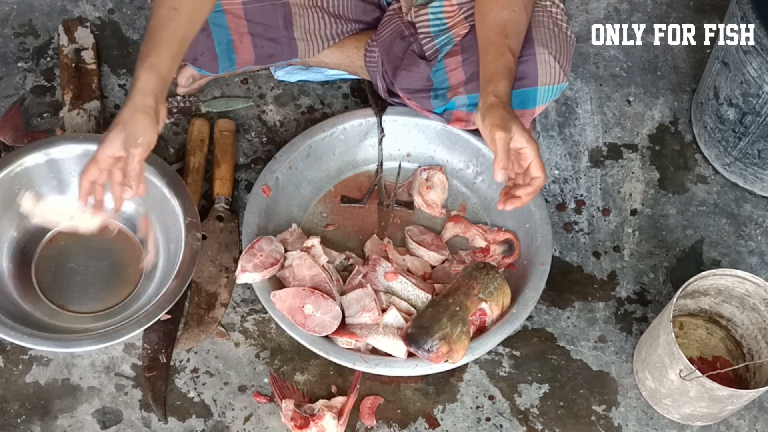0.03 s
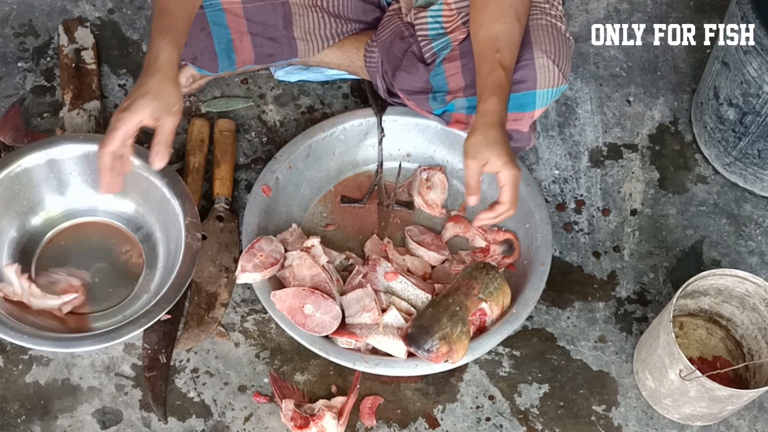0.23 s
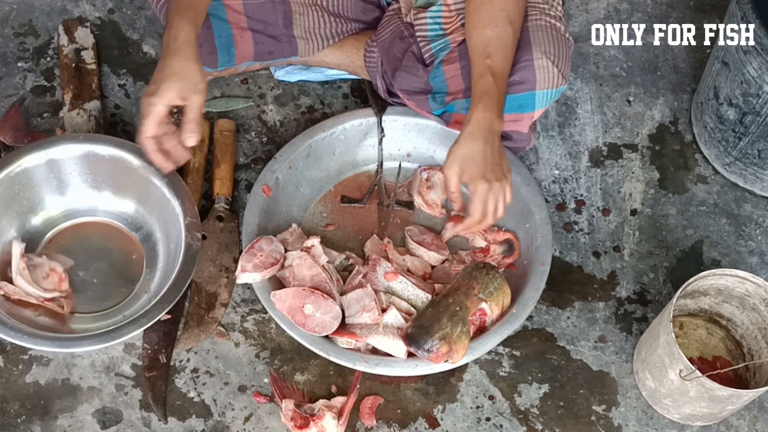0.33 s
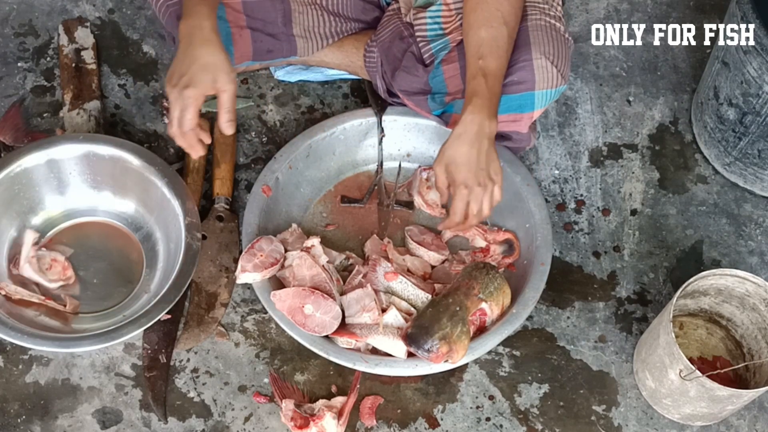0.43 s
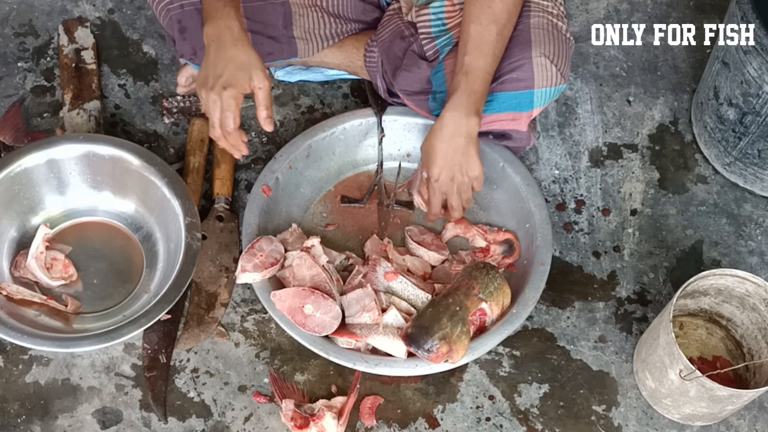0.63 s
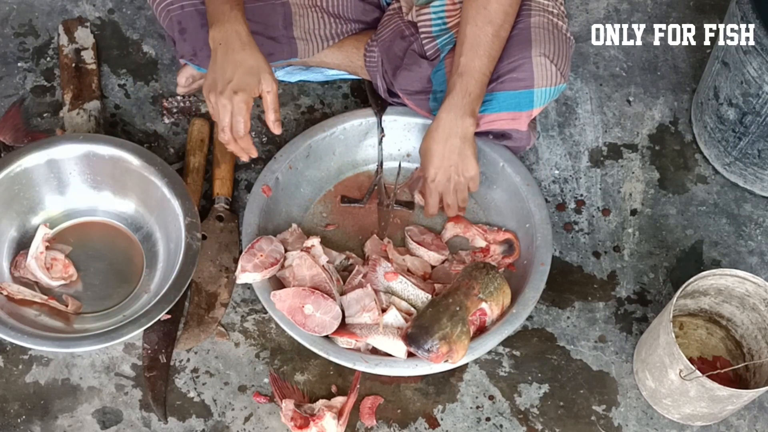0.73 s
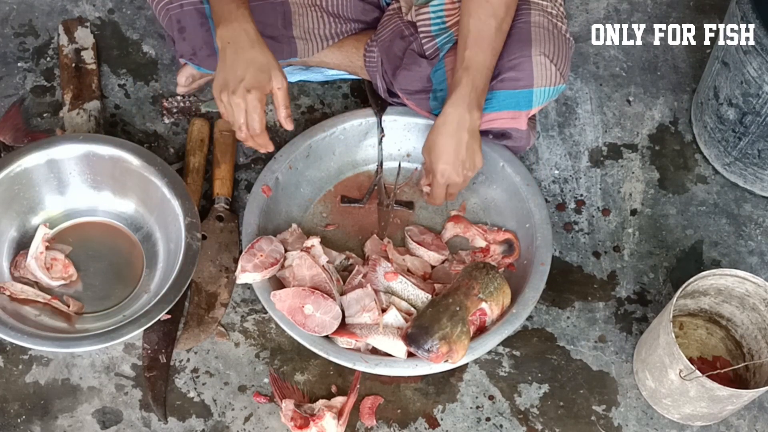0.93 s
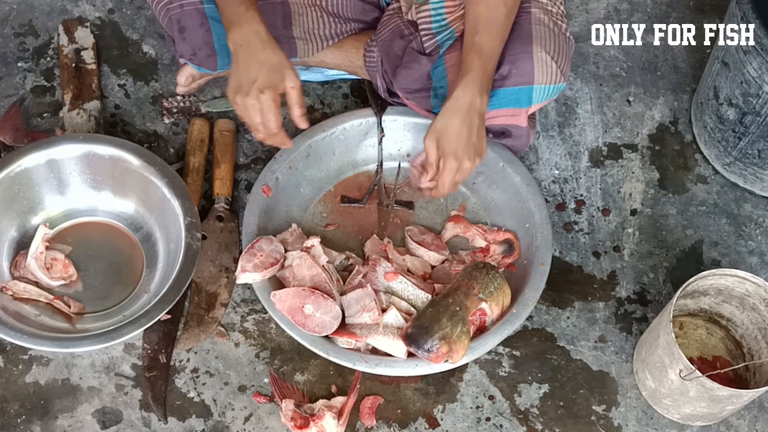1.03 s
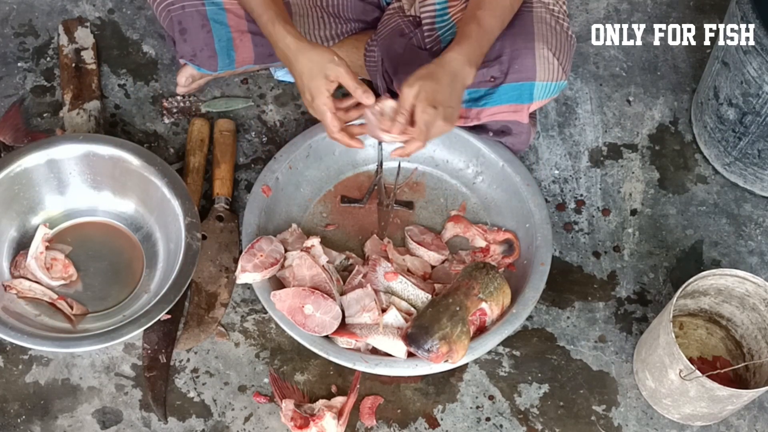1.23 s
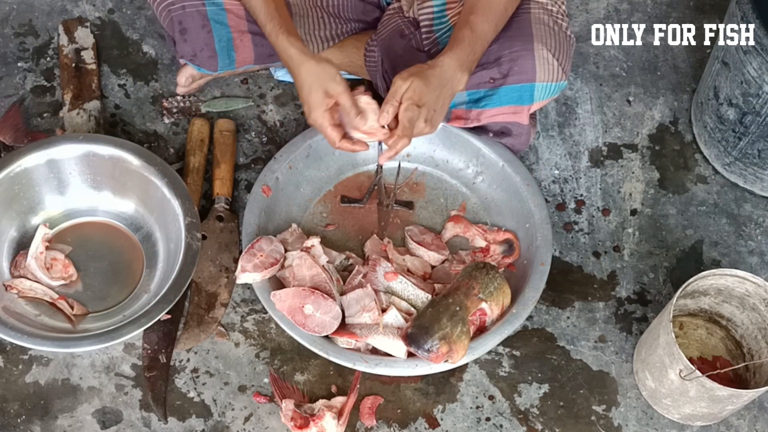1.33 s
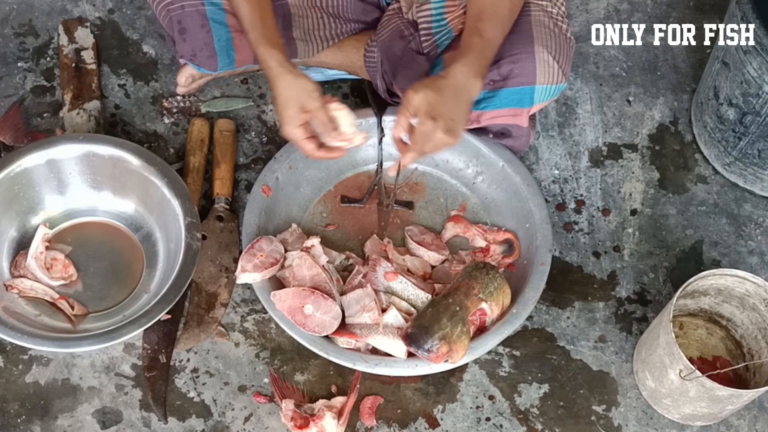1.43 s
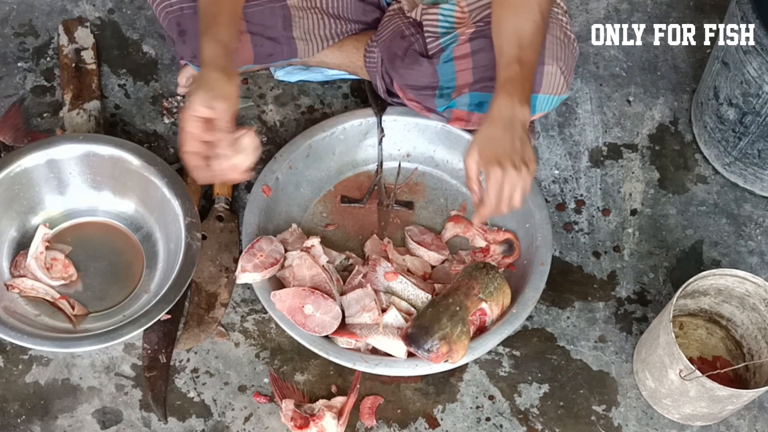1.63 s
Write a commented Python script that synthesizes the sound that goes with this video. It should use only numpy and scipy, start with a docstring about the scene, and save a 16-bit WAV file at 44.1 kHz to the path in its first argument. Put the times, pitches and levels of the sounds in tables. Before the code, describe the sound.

Wet fish lands in a metal bowl with a slap and short ring, birds chirping faintly.

```python
"""An echoing yard, stereo microphones close to a steel bowl. A wet piece of fish is tossed in: it slaps,
slides and flops while the bowl's modes ring and juice spatters. A puff of air brushes the left
microphone, then a hand nudges the pieces in a second basin. Some way off, birds chirp and rasp,
heard mostly by way of the walls, over a low outdoor hum."""
import sys
import numpy as np
from scipy import signal
from scipy.fft import rfft, irfft
from scipy.io import wavfile
from scipy.ndimage import uniform_filter1d, map_coordinates

SR = 44100
rng = np.random.default_rng(int(sys.argv[2]) if len(sys.argv) > 2 else 0)


def materialize(psi):
    """Save the field psi as 16-bit PCM at rate SR to the path in sys.argv[1].

    A 1-D psi becomes a single channel; in a 2-D psi each row is a channel.
    """
    bounded = np.clip(np.atleast_2d(psi).T, -1, 1)
    quanta = np.round(bounded * 32767).astype(np.int16)
    wavfile.write(sys.argv[1], SR, quanta)


N = 74970
STRIKE_S = .2266  # the fish lands


def undb(db):
    """Decibels to gain."""
    return 10 ** (np.asarray(db) / 20)


def unit(x):
    """Scale to rms 1."""
    return x / np.sqrt(np.mean(x ** 2) + 1e-20)


def since(start=0):
    """Seconds elapsed since a moment, zero before it."""
    return np.maximum(np.arange(N) / SR - start, 0)


def fade(t, t60):
    """Exponential decay by 60 dB in t60 seconds."""
    return np.exp(-np.log(1000) * t / max(t60, 1e-3))


def colour(x, points, power=1):
    """Minimum-phase filter through (f/Hz, level/dB) points; power scales the decibels."""
    hz, db = np.array(points, float).T
    f = np.maximum(np.fft.rfftfreq(2 * N, 1 / SR), 1)
    gain = undb(np.interp(np.log(f), np.log(hz), db))
    cepstrum = irfft(power * np.log(gain))
    cepstrum[1:N] *= 2
    cepstrum[N + 1:] = 0
    return irfft(rfft(x, 2 * N) * np.exp(rfft(cepstrum)))[..., :N]


def noise(points):
    """Coloured noise, unrelated left and right."""
    return unit(colour(rng.standard_normal((2, N)), points))


def wander(hz):
    """Smooth random motion of rms 1."""
    size = max(int(SR / hz), 1)
    return unit(uniform_filter1d(uniform_filter1d(rng.standard_normal(N), size), size))


def ring(x, response):
    """Pass a sound through an impulse response."""
    return signal.fftconvolve(np.atleast_2d(x), response, axes=-1)[:, :N]


def arch(start, length):
    """Progress 0-1 through a call and its swelling envelope."""
    progress = np.clip(since(start) / length, 0, 1)
    return progress, np.sqrt(np.abs(np.sin(np.pi * progress)))


def bowl():
    """The landing rings the bowl: high modes at once, low ones slowly as the soft flesh settles."""
    # modes of the steel, one list each: f/Hz, level/dB, t60/s, left minus right/dB
    mode_hz = [238, 278, 400, 538, 597, 642, 711, 1013, 1203, 1435, 1643, 1690, 1772, 1995, 2092, 2237,
               2290, 2505, 2568, 2776, 3195, 5250, 5944, 6305]
    mode_db = [-24.5, -38.5, -20, -13, -15, -16.5, -25.5, -19, -25.5, -16, -21.5, -27, -28.5, -26, -26,
               -23.5, -27.5, -22, -20, -26, -30.5, -44.5, -43, -39.5]
    mode_t60 = [0.33, 1, .25, .37, 0.41, .25, .3, .2, .33, .17, .24, .3, .38, .3, .35, .27, .35, .2, .2, .2,
                .18, .28, .24, .24]
    mode_pan = [0, 8, -3.5, 0.5, 1.5, -6, 2.5, 1, 0, 3.5, 11.5, -5.5, 0.5, -1.5, 0.5, 10, -1, 2.5, -3.5,
                -13, -1, -2.5, -8, -5.5]
    swell_s, swell_hz = .075, 550  # modes above this pitch swell faster
    rest_s, choke_t60_s, choke_above_hz = .427, .14, 350
    t, out = since(STRIKE_S), 0
    for k, (hz, db, t60, pan_db) in enumerate(zip(mode_hz, mode_db, mode_t60, mode_pan)):
        swell = 1 - np.exp(-t / (swell_s * min(swell_hz / hz, 1) ** 2))
        mode = (-1) ** k * np.sin(2 * np.pi * hz * t) * swell * fade(t, t60)
        if hz > choke_above_hz:  # the fish comes to rest and damps the steel
            mode = mode * fade(since(rest_s), choke_t60_s)
        out = out + mode * undb(db + np.array([[pan_db], [-pan_db]]) / 2)
    return out


def splatter():
    """Each wet contact squeezes out a burst of juice, heard as squelch and spray."""
    # contacts: t/s, level/dB, rise/s, t60/s, treble/dB
    splats = [(.2262, -26.5, .001, 0.16, -1), (.235, -21.5, .004, 0.22, 1), (.288, -38, 0.0043, 0.28, 12),
              (0.307, -28, 0.0051, 0.16, -6.5)]
    body_power, treble_power = 0, 0
    for start, db, rise, t60, treble_db in splats:
        t = since(start)
        burst = undb(db) * np.minimum(t / rise, 1) * fade(since(start + rise), t60)
        body_power += burst ** 2
        treble_power += (burst * undb(treble_db)) ** 2
    return squelch(np.sqrt(body_power)) + spray(np.sqrt(treble_power))


def drops(per_s=3500, scatter_db=1):
    """A dense stream of tiny wet clicks of uneven size."""
    clicks = (rng.random(N) < per_s / SR) * rng.choice([-1, 1], N)
    return clicks * undb(scatter_db * rng.standard_normal(N))


def squelch(envelope, width=.91):
    """Juice squelches out under the skin, wider between the microphones above 1 kHz."""
    # squelch spectrum: f/Hz, level/dB
    spectrum = [(60, -40.5), (130, -12.5), (200, -7), (330, -2.5), (580, -2), (820, 0.5), (1400, -2),
                (2600, -1.5), (3400, -11.5), (5000, -21.5), (15000, -58)]
    side = width * colour(drops(), [(500, -11.5), (1500, 1.5)]) * np.array([[1], [-1]])
    return unit(colour(drops() + side, spectrum)) * envelope


def thin_wall(low_hz=3080, high_hz=15050, count=130, t60=.05):
    """Impulse response of the dense upper modes of the bowl's thin wall."""
    t = since()[:N // 4]
    places = (np.arange(count) + rng.random(count)) / count
    pitches = low_hz + (high_hz - low_hz) * places
    modes = sum(np.sin(2 * np.pi * (hz * t + rng.random((2, 1)))) for hz in pitches)
    return unit(modes * fade(t, t60)) / np.sqrt(len(t))


def spray(envelope):
    """Droplets fizz and stir the bowl's wall; the finest stop first, so the fizz dulls."""
    # spray spectrum: f/Hz, level/dB
    spectrum = [(1500, -22), (3500, -5), (5300, 4.5), (7000, -2.5), (8500, -12), (11000, -17.5),
                (15000, -14)]
    # treble loss once the finest spray stops: f/Hz, level/dB
    dulling = [(7500, -1.5), (9500, -5)]
    wall = thin_wall()
    droplets = undb(-10) * unit(colour(np.array([drops(), drops()]), spectrum)) * envelope
    fizz = droplets + undb(-3.5) * ring(droplets, wall)
    fresh = fade(since(.324), t60=.18)
    return fresh * fizz + (1 - fresh) * colour(fizz, dulling)


def slap():
    """The skin cracks against the metal in one short burst of noise."""
    # crack spectrum: f/Hz, level/dB
    spectrum = [(300, -32.5), (1000, -14.5), (1800, -5), (2600, 2.5), (3200, -11.5), (5000, -22.5),
                (8000, -35), (15000, -32)]
    t = since(STRIKE_S)
    return undb(-14.5) * noise(spectrum) * (t > 0) * fade(t, t60=.064)


def notes_and_throb():
    """Short hollow notes and squeaks as the fish lands, then the bowl's ringing throbs near 570 Hz."""
    # tone pulses: t/s, f/Hz, level/dB, swell/s
    pulses = [(.236, 583, -23, .007), (.244, 230, -37, .005), (0.2534, 1300, -21.5, .004),
              (.2615, 581.4, -18.5, 0.0025), (.2795, 576, -14.5, 0.0052), (0.285, 1685, -27.5, .012),
              (0.289, 199.8, -35, 0.012), (.312, 2113, -22, .01), (0.3172, 578, -31, 0.0077),
              (.3335, 557, -26, 0.0058), (.3495, 595, -26.5, 0.0043), (.35, 167, -46.5, 0.015),
              (.368, 570, -52, 0.0014)]
    out = 0
    for start, hz, db, swell in pulses:
        t = since(start)
        envelope = t / swell * np.exp((1 - (t / swell) ** 2) / 2)
        out += undb(db) * envelope * np.sin(2 * np.pi * hz * t)
    return out


def nudges():
    """Pieces shift in the loaded second basin: a damped note and a short wet rustle each."""
    # nudges: t/s, level/dB, f/Hz, t60/s
    shifts = [(0.7075, -46.5, 1457, .03), (.709, -54.5, 550, 0.25), (0.7645, -37, 547, 0.098),
              (.779, -52.5, 1550, 0.1), (0.803, -47, 1353, .04), (0.81, -43, 1200, .045),
              (.818, -46.5, 906, 0.068)]
    # rustle spectrum: f/Hz, level/dB
    spectrum = [(150, -46), (400, -20), (550, -14), (720, 0), (950, -4), (1500, 1), (1800, -3.5),
                (2200, -15), (5000, -23), (12000, -50)]
    notes, rustle_power = 0, 0
    loudest_db = max(row[1] for row in shifts)
    for start, db, hz, t60 in shifts:
        t = since(start)
        notes += undb(db) * np.sin(2 * np.pi * hz * t) * fade(t, t60) * (1 - np.exp(-t * hz))
        rustle_db = -59 + .16 * (db - loudest_db)  # barely follows the note's level
        rustle_power += (undb(rustle_db) * (t > 0) * fade(t, t60=.28)) ** 2
    return notes + np.sqrt(rustle_power) * noise(spectrum)


def puffs(right_db=-31):
    """Puffs of air: slow pressure swings, almost only on the left microphone."""
    # swings: t/s, level/dB, width/s, f/Hz
    swings = [(.008, -43, .01, 57.3), (0.058, -53.5, 0.036, 45), (0.366, -31, 0.013, 60),
              (0.391, -20.5, 0.0057, 62.6), (0.418, -31.5, 0.0053, 42), (0.477, -37.5, .011, 56.7),
              (0.609, -54.5, 0.02, 50.3), (1.588, -52, 0.029, 58.9)]
    t, air = since(), 0
    for at, db, width, hz in swings:
        envelope = np.exp(-((t - at) / width) ** 2 / 2)
        air += undb(db) * envelope * np.sin(2 * np.pi * hz * (at - t))
    return air * undb([[0], [right_db]])


def chirps(waver_hz=697):
    """Distant birds give thin, wavering whistles that glide."""
    # whistles: t/s, length/s, start f/Hz, end f/Hz, level/dB, waver/share of pitch
    whistles = [(-.03, 0.036, 3470, 3286, -32.5, 0.046), (0.012, 0.049, 3220, 1693, -51.5, 0.039),
                (0.037, 0.18, 3558, 3580, -67, 0.0049), (.045, 0.031, 1766, 1748, -53, 0.014),
                (.142, 0.055, 7180, 6560, -55.5, 0.051), (0.185, 0.041, 5840, 6020, -50, 0.027),
                (0.185, 0.045, 7030, 7060, -47.5, 0.0088), (0.424, 0.093, 3620, 3620, -70.5, 0.0062),
                (.61, 0.032, 5150, 4690, -73, 0.029), (1.216, 0.052, 5214, 5222, -57.5, 0.052),
                (1.242, 0.0338, 4450, 4165, -54.5, .03), (1.268, .04, 3810, 3570, -60, 0.0363),
                (1.433, .05, 7176, 6170, -60, .035), (1.464, 0.063, 5580, 5160, -55, 0.051),
                (1.484, 0.077, 6156, 5800, -52.5, 0.083), (1.475, 0.037, 6950, 6870, -48.5, .01),
                (1.541, 0.054, 6980, 6850, -47.5, 0.028)]
    out = 0
    for start, length, from_hz, to_hz, db, waver in whistles:
        progress, swell = arch(start, length)
        hz = (from_hz + (to_hz - from_hz) * progress) * (1 + waver * wander(waver_hz))
        out += undb(db) * swell * np.sin(2 * np.pi * np.cumsum(hz) / SR)
    return out


def rasps(rise=.27):
    """Distant birds scold tonelessly: hiss with two throat resonances that rise through each call."""
    # calls: t/s, length/s, level/dB
    calls = [(-.05, 0.061, -39), (0.806, 0.099, -54.5), (0.963, 0.0885, -52.5), (1.53, 0.096, -51.5)]
    # hiss spectrum: f/Hz, level/dB
    spectrum = [(800, -39.5), (1200, -27), (1450, -5), (2350, -15.5), (2900, -7), (3750, -2), (4500, -3.5),
                (5300, -5.5), (7000, -11.5), (8400, -28), (15000, -27.5)]
    # throat resonances at mid-call: f/Hz, width/Hz, level/dB
    resonances = [(1500, 310, -3.5), (1987, 82, -7)]
    out, hiss = 0, noise(spectrum)[0]
    for start, length, db in calls:
        progress, swell = arch(start, length)
        warped_t = np.cumsum(1 + rise * (progress - .5)) / SR
        throat = sum(undb(peak_db) * wander(width) * np.sin(2 * np.pi * hz * warped_t)
                     for hz, width, peak_db in resonances)
        out += undb(db) * swell ** 2 * (hiss + throat)
    return out


def yard(x, t60, build_s=.0023, treble_t60_share=.87):
    """Diffuse echo of the yard's walls; the treble dies sooner."""
    t = since()
    low = colour(rng.standard_normal((2, N)), [(4000, 0), (9000, -13.5)])
    high = colour(rng.standard_normal((2, N)), [(4000, -18.5), (9000, -3.5)])
    tail = low * fade(t, t60) + high * fade(t, t60 * treble_t60_share)
    build = 1 - np.exp(-t / build_s)
    return ring(x, unit(tail * build) / np.sqrt(N))


def hum(wide_hz=915):
    """Outdoor ambience, alike on both microphones in the bass and diffuse in the treble."""
    # ambience spectrum: f/Hz, level/dB
    spectrum = [(15, -35.5), (25, 2.5), (59, 0), (154, -7.5), (573, -12), (769, -20), (2180, -28),
                (3090, -33.5), (3630, -36.5), (4870, -33), (7280, -45), (8780, -46), (15000, -48.5)]
    mid, side = noise(spectrum)
    side = colour(side, [(wide_hz / 2, -9.5), (wide_hz, 0)])
    return undb(-63) * (mid + side * np.array([[1], [-1]]))


def scene():
    """Bowl and basin are close and fairly dry; the birds arrive mostly by the walls."""
    # what the walls return of bowl and basin: f/Hz, level/dB
    echo_colour = [(200, -0.5), (600, -6), (1200, -6.5), (2200, -3.5), (7000, -1), (9500, -14)]
    left_lag_s = .00013  # the bowl reaches the left microphone later
    left, right = bowl() + splatter() + slap() + notes_and_throb()
    left = map_coordinates(left, [np.arange(N) - left_lag_s * SR])
    near = np.array([left, right]) + nudges()
    whistles, calls = chirps(), rasps()
    birds = undb(-11.5) * whistles + yard(whistles, t60=.4)
    birds += undb(-7) * calls + yard(calls, t60=.25)
    near_echo = undb(-12) * yard(colour(near, echo_colour), t60=.39)
    return near + near_echo + birds + puffs() + hum()


def record(dry, top_hz=15600):
    """The left microphone is mostly duller than the right; the top is cut off."""
    # microphone imbalance: f/Hz, left minus right/dB
    imbalance = [(100, -1), (2400, -0.5), (4400, -2.5), (5800, -12.5), (7100, -17.5), (8200, -5.5),
                 (9500, 8.5), (12000, -2), (15000, -9)]
    heard = np.array([colour(dry[0], imbalance, power=.5), colour(dry[1], imbalance, power=-.5)])
    return signal.sosfilt(signal.ellip(10, .2, 80, top_hz, fs=SR, output="sos"), heard)


dry = scene()
out = record(dry)
materialize(out)
```